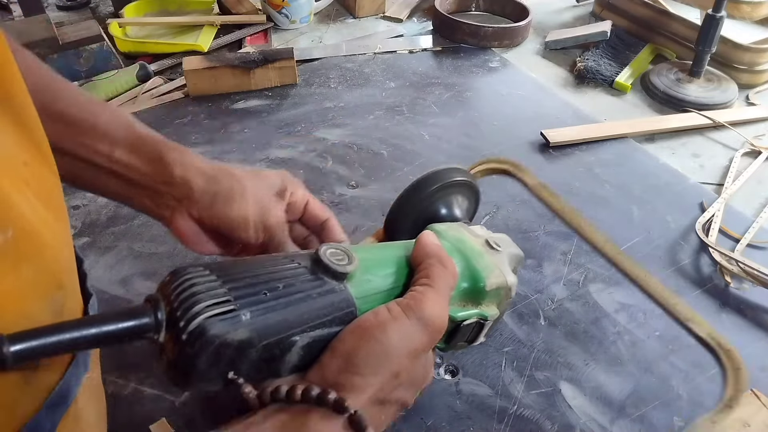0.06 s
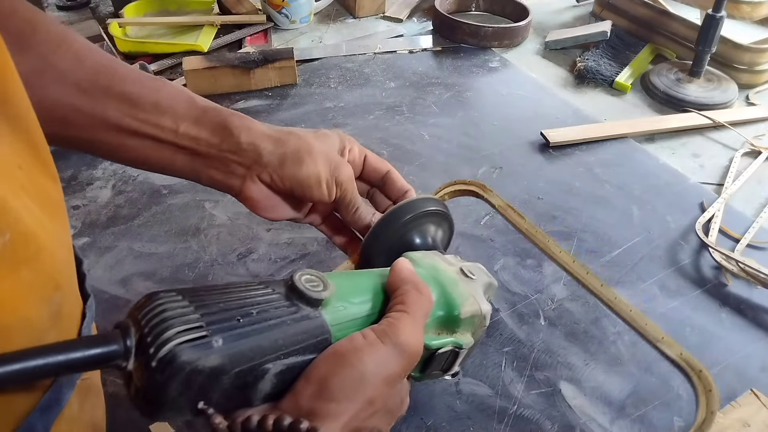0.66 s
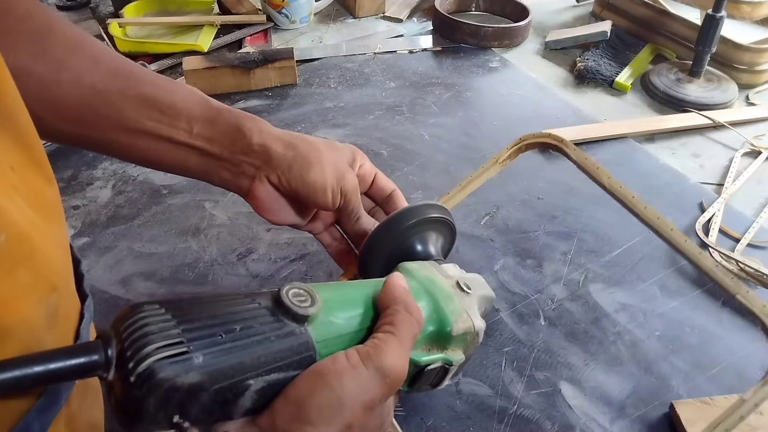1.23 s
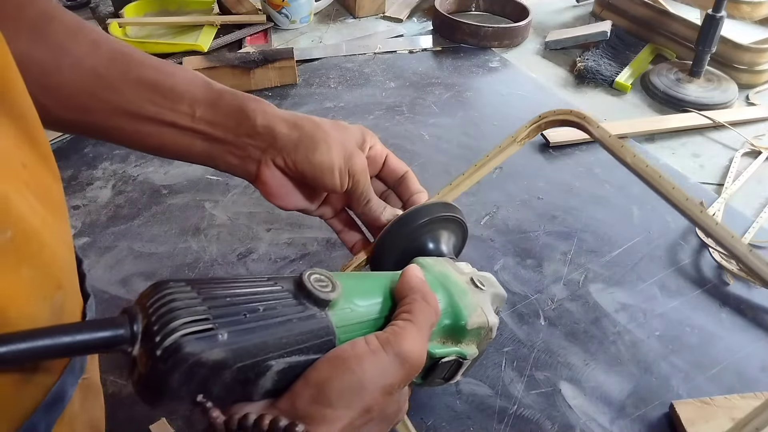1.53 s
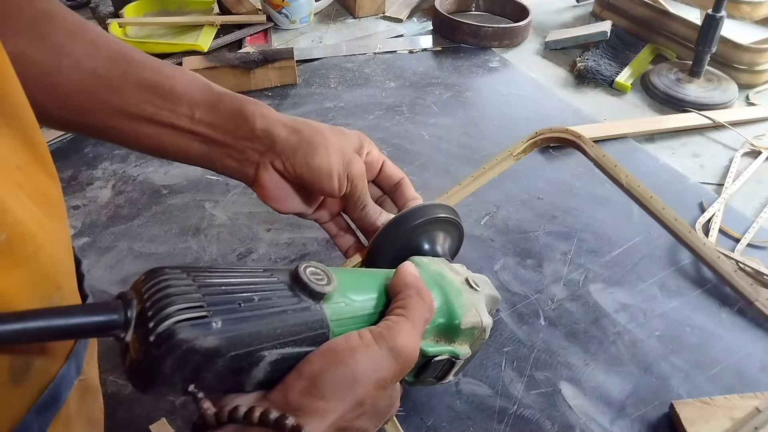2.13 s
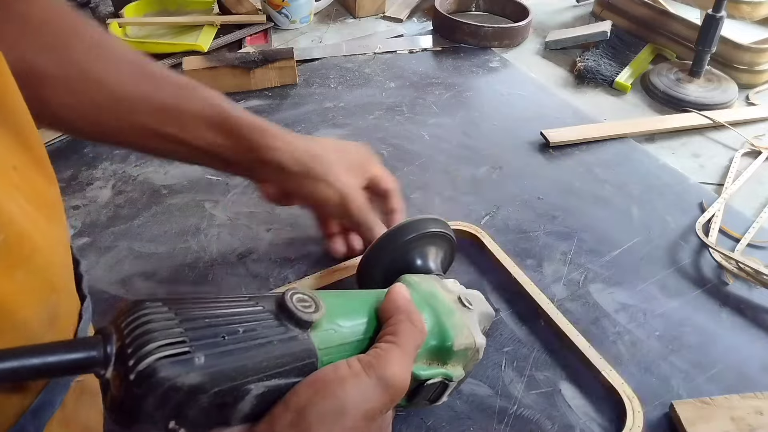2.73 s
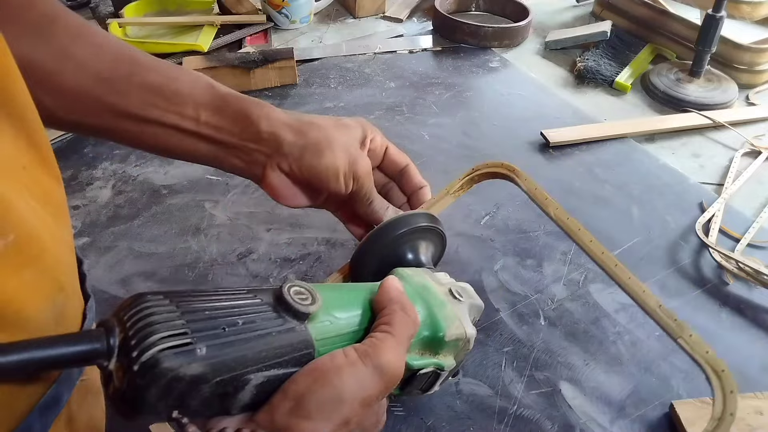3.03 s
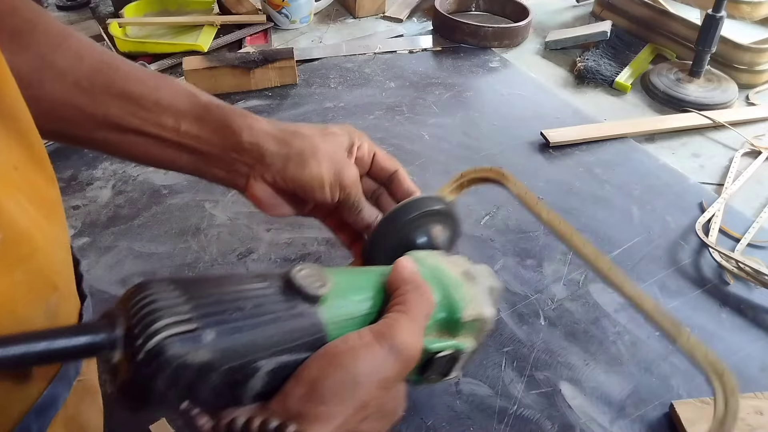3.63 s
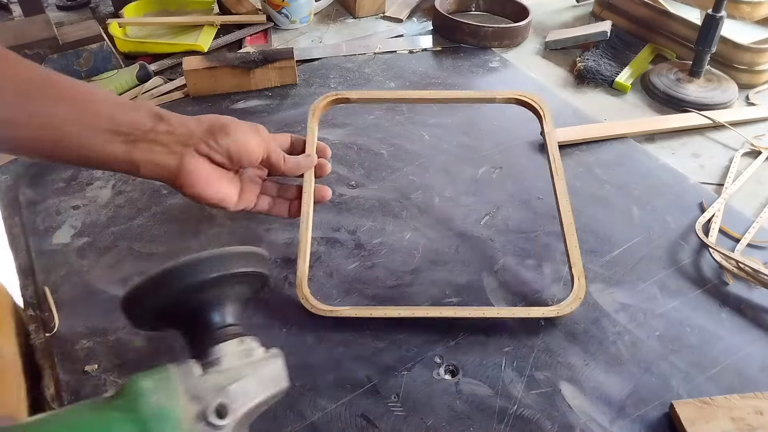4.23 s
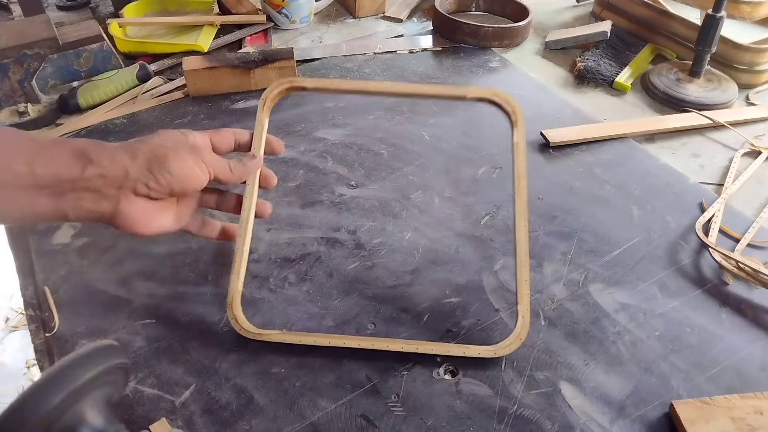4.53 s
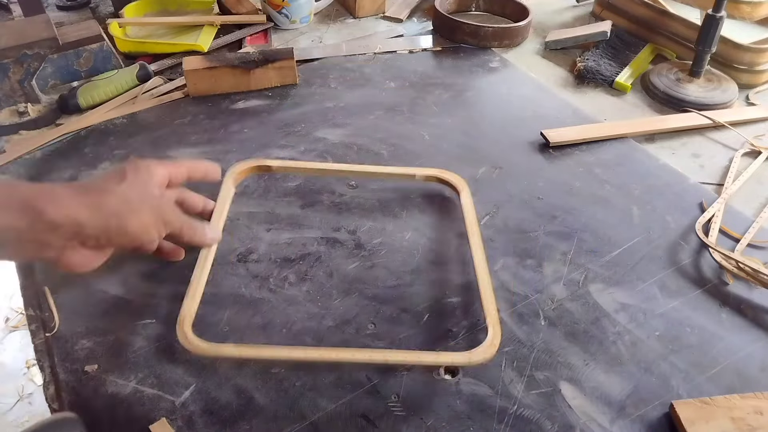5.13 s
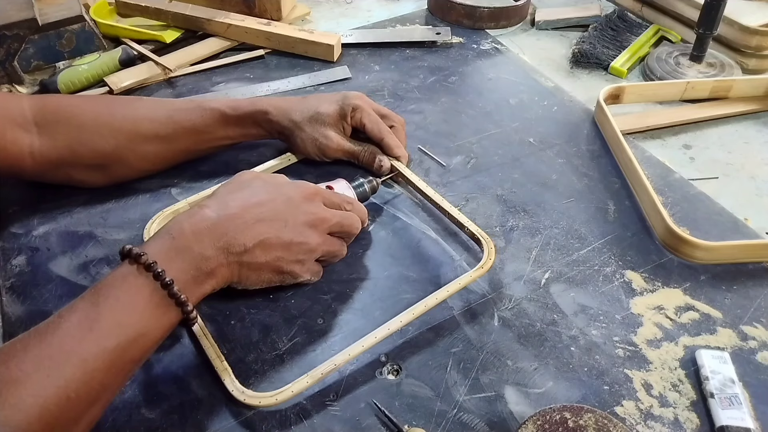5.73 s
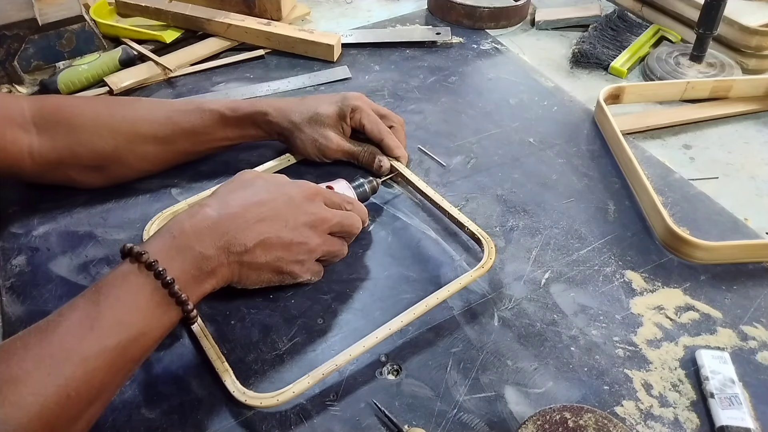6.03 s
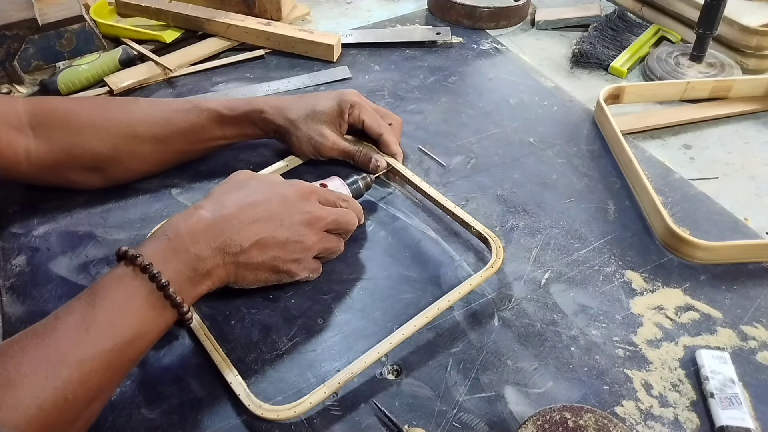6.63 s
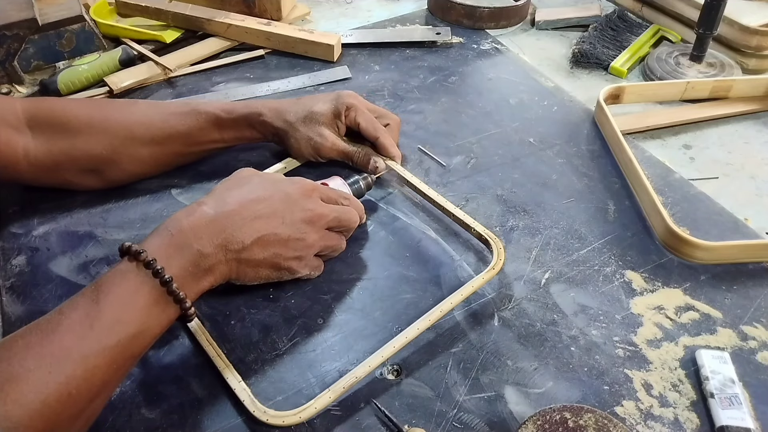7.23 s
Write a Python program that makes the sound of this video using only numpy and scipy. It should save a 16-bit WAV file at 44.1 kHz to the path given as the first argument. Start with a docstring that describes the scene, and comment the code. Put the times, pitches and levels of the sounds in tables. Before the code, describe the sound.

A loud electric grinder runs its sanding disc on wood, gritty and hissing, with a few sharper scrapes. After about four seconds it is switched off and coasts down under a handful of light wooden knocks on a workbench. Then a quieter rotary tool cuts in, whining, giving two brief squeals and dipping in speed twice. Everything is heard up close in a small workshop with little echo.

```python
"""Small workshop, close up. An angle grinder sands a thin wooden frame: gear teeth knock, grit rasps,
air hisses and the wobbling disc makes it throb. It is lifted off and coasts down with rattling gears.
The frame clatters onto the bench. Then, abruptly, a small rotary tool whines at multiples of its shaft
rate, sagging and recovering in speed, and its bit sticks and slips in the wood in two squeals."""
import sys
import numpy as np
from scipy import signal
from scipy.fft import rfft, irfft
from scipy.io import wavfile
from scipy.ndimage import uniform_filter1d

SR = 44100
rng = np.random.default_rng(int(sys.argv[2]) if len(sys.argv) > 2 else 0)


def bounce(signal):
    """Save signal as a 16-bit WAV file at the path given by the first command-line argument."""
    frames = np.transpose(np.atleast_2d(signal))
    limited = np.clip(frames, -1, 1)
    pcm = np.round(limited * 32767).astype(np.int16)
    wavfile.write(sys.argv[1], SR, pcm)


N = 320607
T = np.arange(N) / SR


def undb(db):
    return 10 ** (np.asarray(db) / 20)


def unit(x):
    """Scale to rms 1."""
    return x / np.sqrt(np.mean(x ** 2))


def turn(hz):
    """Running phase in radians."""
    return 2 * np.pi * np.cumsum(hz) / SR


def hump(centre_s, length_s):
    """Gaussian rise and fall."""
    return np.exp(-(2 * (T - centre_s) / length_s) ** 2)


def envelope(start_s, attack_s, hold_s, release_s):
    """Linear rise, hold, exponential release."""
    rise = np.clip((T - start_s) / attack_s, 0, 1)
    return rise * np.exp(-np.maximum(T - start_s - attack_s - hold_s, 0) / release_s)


def wander(hz):
    """Smooth noise of rms 1, up to about hz."""
    f = np.arange(N // 2 + 1) * SR / N
    return unit(irfft(rfft(rng.standard_normal(N)) / np.sqrt(1 + (f / hz) ** 6), N))


def narrow(phase, width_hz):
    """Noise band around a carrier phase."""
    return unit(wander(width_hz / 2) * np.cos(phase) + wander(width_hz / 2) * np.sin(phase))


def impacts(per_s, scatter_db):
    """Random tiny blows of uneven size, at even mean power."""
    hit = rng.random(N) < per_s / SR
    sign = rng.choice([-1, 1], N)
    return unit(hit * sign * undb(scatter_db * rng.standard_normal(N)) / np.sqrt(per_s))


def lift_db(hz, resonances):
    """Summed gain of resonances at hz."""
    return sum(db / (1 + (2 * (hz - centre) / width) ** 2) for centre, width, db in resonances)


def colour(x, spectrum, resonances=(), size=8192):
    """Minimum-phase filter: broad spectrum plus resonances; keeps the power of white noise."""
    f = np.arange(size // 2 + 1) * SR / size + 1
    hz, db = np.transpose(spectrum)
    gain_db = np.interp(np.log(f), np.log(hz), db) + lift_db(f, resonances)
    cepstrum = irfft(np.log(undb(gain_db)))
    cepstrum[1:size // 2] *= 2
    cepstrum[size // 2 + 1:] = 0
    response = irfft(np.exp(rfft(cepstrum)))
    return signal.fftconvolve(x, response / np.linalg.norm(response))[:N]


# room tone: f/Hz, level/dB
ROOM_SPECTRUM = [(20, -28), (60, -6), (110, -9), (250, -8), (500, -4), (2000, -12), (6000, -28),
                 (15000, -36)]


def still_air(level_db=-59.5):
    """Faint, dull noise of the workshop."""
    return colour(rng.standard_normal(N), ROOM_SPECTRUM) * undb(level_db)


def workshop(x, t60_s=0.55, wet_db=-14):
    """The cluttered walls add a short, dull tail."""
    t = T[:SR // 2]
    dull_noise = uniform_filter1d(rng.standard_normal(len(t)), size=4)
    tail = dull_noise * np.exp(-np.log(1000) * t / t60_s) * (t > .005)
    return x + undb(wet_db) * signal.fftconvolve(x, tail / np.linalg.norm(tail))[:N]


# frame knocks on the bench: t/s, level/dB
FRAME_KNOCKS = [(4.612, -25), (4.710, -33), (4.878, -30), (5.012, -27), (5.053, -29), (5.111, -23.5),
                (5.125, -22.5), (5.147, -17), (5.151, -28), (5.158, -30), (5.194, -35), (5.223, -35),
                (5.274, -31)]
# wood clack: f/Hz, level/dB
KNOCK_SPECTRUM = [(60, -27), (160, -5), (400, -5.5), (900, 0), (1300, 3), (2500, 3.5), (3800, 4.5),
                  (5500, -12.5), (8000, -8.5), (11000, -28), (15000, -27)]
# frame rings as fingers shift it: t/s, f/Hz, level/dB
FRAME_TAPS = [(4.704, 2380, -22), (4.878, 2230, -21), (4.925, 2200, -38), (4.941, 2260, -24),
              (4.962, 2200, -42)]
# bench-top thuds: t/s, f/Hz, level/dB
BENCH_BUMPS = [(.07, 135, -43), (.48, 95.3, -43), (2.91, 132.5, -43), (2.965, 150, -35), (2.975, 270, -34),
               (3.085, 145, -45), (3.17, 145.3, -45), (3.39, 140, -43), (5.108, 171, -38),
               (5.146, 192, -51), (5.316, 124, -37.5), (5.59, 112, -56)]


def frame_on_bench(knock_decay_s=0.0057, tap_decay_s=0.0055, bump_decay_s=0.017):
    """Light wood clacks and rings; the bench answers heavier touches with a low thud."""
    clacks, rings, thuds = np.zeros((3, N))
    for at_s, db in FRAME_KNOCKS:
        clacks += (T >= at_s) * undb(db) * np.exp(-np.abs(T - at_s) / knock_decay_s)
    for at_s, hz, db in FRAME_TAPS:
        age_s = np.maximum(T - at_s, 0)
        rings += undb(db) * np.exp(-age_s / tap_decay_s) * np.sin(2 * np.pi * hz * age_s)
    for at_s, hz, db in BENCH_BUMPS:
        age = np.maximum(T - at_s, 0) / bump_decay_s
        thuds += undb(db) * 2 * np.sqrt(age) * np.exp(-age) * narrow(2 * np.pi * hz * T, width_hz=103)
    return colour(clacks * rng.standard_normal(N), KNOCK_SPECTRUM) + rings + thuds


# two squeals of four chirps: t/s, length/s, start f/Hz, end f/Hz, width/Hz, level/dB
BIT_CHIRPS = [(5.583, 0.019, 5000, 4750, 700, -30), (5.599, 0.02, 3680, 3670, 70, -17.5),
              (5.615, 0.012, 2780, 2840, 148, -20), (5.624, 0.027, 3950, 4050, 420, -19),
              (5.694, .028, 4400, 4150, 706, -28), (5.714, 0.024, 3560, 3480, 81, -20),
              (5.74, 0.0243, 3600, 3870, 435, -19), (5.749, 0.023, 3800, 4050, 342, -20)]


def bit_squeals():
    """The bit sticks and slips in short rough chirps."""
    out = np.zeros(N)
    for start_s, length_s, start_hz, end_hz, width_hz, db in BIT_CHIRPS:
        progress = np.clip((T - start_s) / length_s, 0, 1)
        # faster phase diffusion gives a wider, rougher tone
        slip = np.cumsum(rng.standard_normal(N)) * np.sqrt(np.pi * width_hz / SR)
        phase = turn(start_hz + (end_hz - start_hz) * progress) + uniform_filter1d(slip, size=30)
        out += np.sqrt(2 * np.abs(np.sin(np.pi * progress))) * undb(db) * np.sin(phase)
    return out


def partial(shaft_phase, order, db, flutter_db):
    """One multiple of the shaft rate, fluttering in level."""
    flutter = unit(undb(flutter_db * wander(21)))
    return np.sqrt(2) * undb(db) * flutter * np.sin(order * shaft_phase + rng.uniform(0, 2 * np.pi))


# bit brushes the wood: t/s, length/s, gain/dB
BIT_BRUSHES = [(5.328, 0.034, -34.5), (5.56, 0.23, -33.5), (5.88, 0.22, -38), (6.705, 0.15, -39),
               (6.876, 0.16, -36)]
# bit on wood: f/Hz, level/dB
CHATTER_SPECTRUM = [(1000, -22), (3000, -1), (3700, 19.5), (4800, 8.5), (5600, 1), (6500, 2), (8300, -22),
                    (9500, -4), (10500, -4), (12000, -9), (15500, -26)]


def bit_chatter(shaft_phase, attack_s=0.058, release_s=0.054):
    """While in contact, the bit ticks against the wood once a turn."""
    ticks = sum(partial(shaft_phase, order, db=0, flutter_db=3.8) for order in range(9, 41))
    contact = sum(undb(db) * envelope(start_s, attack_s, length_s - attack_s, release_s)
                  for start_s, length_s, db in BIT_BRUSHES)
    return colour(unit(ticks), CHATTER_SPECTRUM) * contact


# whine (18 = commutator whistle): shaft order, full-speed level/dB, flutter/dB, full-load gain/dB
SHAFT_PARTIALS = [(1, -35, -0.4, 2.5), (2, -43.5, 1.5, 8.5), (3, -37.5, 2.0, 0), (4, -48, 8, -4),
                  (5, -36.5, 1.2, -5), (6, -46.5, -2, -5), (7, -49.5, 1.5, 2), (9, -41, -1, -1),
                  (10, -43.5, -4, -2), (12, -49, 6, 3), (13, -52.5, -1, 8), (18, -41, 2.5, -3),
                  (21, -54, 7, -3), (24, -60, 4, -3)]
# partials that ring out briefly: shaft order, t/s, length/s, gain/dB
PARTIAL_RINGS = [(3, 5.42, 0.16, 3.5), (5, 5.69, 0.047, 10.5), (5, 5.79, 0.11, 5), (5, 5.95, 0.18, 8),
                 (5, 7.5, 0.1, 10), (7, 5.92, 0.06, 4)]
# resonances and dead spots of tool and bench: f/Hz, width/Hz, gain/dB
CASING_MODES = [(307, 14, 5), (336, 23, -12), (372, 15, 4.5), (624, 16, -11), (696, 60, 6.5),
                (776, 8.4, -11), (783, 8, 0.5), (1138, 36, 8.5), (1173, 6.1, -5), (1780, 110, 5),
                (1915, 25, 13), (1955, 28, 6.5), (2717, 180, 14.5), (4460, 79, 10), (6870, 310, 8),
                (8070, 200, 10), (9400, 150, 11)]


def shaft_whine(shaft_hz, shaft_phase, full_load_hz_per_s=300, slowing_db=8.5):
    """Partials glide through fixed resonances and weaken as the shaft slows, the high ones most."""
    slowing_hz_per_s = uniform_filter1d(-np.gradient(shaft_hz) * SR, size=SR // 20)
    load = np.clip(slowing_hz_per_s / full_load_hz_per_s, 0, 1)
    halvings = np.log2(shaft_hz.max() / shaft_hz)
    out = np.zeros(N)
    for order, db, flutter_db, load_db in SHAFT_PARTIALS:
        drive_db = db + load_db * load - slowing_db * np.log2(order) * halvings
        ring_db = sum(gain_db * hump(at_s, length_s)
                      for k, at_s, length_s, gain_db in PARTIAL_RINGS if k == order)
        casing_db = lift_db(order * shaft_hz, CASING_MODES)
        out += partial(shaft_phase, order, drive_db + ring_db + casing_db, flutter_db)
    return out


# shaft rate: t/s, f/Hz
SHAFT_RATE = [(5.36, 375.7), (5.498, 386.2), (5.636, 392.4), (5.96, 390.6), (6.088, 381.9), (6.152, 370.2),
              (6.296, 311.7), (6.338, 308.5), (6.36, 321.7), (6.486, 351.6), (6.55, 363.1), (6.7, 380.1),
              (6.8, 384.8), (6.956, 379.1), (7.034, 369.8), (7.216, 330.2), (7.27, 332.4)]
# cooling air: f/Hz, level/dB
FAN_SPECTRUM = [(30, -27), (90, -14.5), (150, -4.5), (250, -15.5), (550, -11), (800, -2.5), (1250, 3.5),
                (1900, 2.5), (2400, -6), (3800, 0), (5200, -9.5), (6500, -11), (7900, -3.5), (10000, -20),
                (15500, -15.5)]


def rotary_tool(bearing_db=-33.5, bearing_pulse=0.59, fan_db=-30.5):
    """One shaft drives whine, bearing whirr, fan and bit; the mains pulses the whirr and the air."""
    shaft_hz = np.interp(T, *np.transpose(SHAFT_RATE))
    speed = shaft_hz / shaft_hz.max()
    shaft_phase = turn(shaft_hz * (1 + 0.001 * wander(33)))
    whine = shaft_whine(shaft_hz, shaft_phase)
    torque = np.cos(2 * np.pi * 100 * T)  # two pulses per mains cycle
    whirr = narrow(8 * shaft_phase + .8 * torque, width_hz=100)
    bearing = unit(whirr * (1 + bearing_pulse * torque)) * undb(bearing_db)
    airflow = undb(fan_db) * speed ** 1.5 * (1 + 0.2 * torque)
    air = colour(rng.standard_normal(N), FAN_SPECTRUM, resonances=[(161, 120, 5.6)]) * airflow
    return whine + bearing + air + bit_chatter(shaft_phase)


# disc edge bites harder: t/s, length/s, level/dB
RIM_BITES = [(0.37, 0.013, -22), (0.442, 0.046, -25), (0.526, 0.067, -26), (0.59, 0.11, -31),
             (0.683, 0.1, -26.5), (2.913, .04, -25), (2.963, 0.056, -23), (3.034, 0.044, -26),
             (3.17, .03, -29), (3.40, 0.061, -29)]
# rim on wood: f/Hz, level/dB
SCRATCH_SPECTRUM = [(300, -19), (2000, -24), (4000, -24), (6000, 2), (9000, 7), (11000, 0), (13000, 6),
                    (15500, -6)]


def rim_scratches(disc_hz=185):
    """During each bite, the grinder's rim catches the wood once a turn."""
    bite = sum(undb(db) * hump(at_s, length_s) for at_s, length_s, db in RIM_BITES)
    catches = unit(undb(6 * np.cos(2 * np.pi * disc_hz * T)))
    return colour(impacts(per_s=12000, scatter_db=3.5) * catches, SCRATCH_SPECTRUM) * bite


# passing grinder tones: t/s, attack/s, hold/s, release/s, f/Hz, glide/(Hz/s), width/Hz, waver/dB, level/dB
HOARSE_TONES = [(0.268, 0.03, 0.04, 0.03, 1400, 0, 200, 2, -22),
                (2.85, 0.05, 0.1, 0.046, 4100, 4, 50, 10, -23),
                (3.262, 0.06, 0.25, 0.06, 2945, -150, 490, 2.5, -19.5),
                (3.65, 0.07, 0.02, 0.04, 2780, -62, 400, 3, -16.5),
                (3.71, 0.11, 0.073, 0.07, 1680, -600, 563, 1.5, -16),
                (3.918, 0.052, 0.06, 0.13, 1420, 701, 560, 1.3, -14.5),
                (4.086, 0.028, 0.068, 0.31, 2787, -59, 260, 0.5, -26.5),
                (4.72, 0.06, 0.09, 0.04, 9200, -5500, 90, 6, -58)]


def grinder_swells(low_cut_hz=400):
    """Hoarse tones come and go: wood rings, vents whistle, the free disc rushes, slowing gears sing."""
    out = np.zeros(N)
    for start_s, attack_s, hold_s, release_s, hz, hz_per_s, width_hz, waver_db, db in HOARSE_TONES:
        glide_hz = np.clip(hz + hz_per_s * np.maximum(T - start_s, 0), hz / 2, 2 * hz)
        tone = unit(narrow(turn(glide_hz), width_hz) * undb(waver_db * wander(16)))
        out += undb(db) * tone * envelope(start_s, attack_s, hold_s, release_s)
    return signal.sosfilt(signal.butter(2, low_cut_hz, "high", fs=SR, output="sos"), out)


# gear rattle, grit rasp, air hiss: f/Hz, level/dB
GEAR_SPECTRUM = [(30, -69), (90, -27.5), (280, -20.5), (580, -9.5), (720, -2.5), (1100, 0), (1900, -5.5),
                 (3200, -8.5), (4500, -21.5), (8000, -23), (16000, -37)]
RASP_SPECTRUM = [(300, -44.5), (1000, -10), (2000, -4.5), (2900, -4.5), (3650, -1), (4150, -3),
                 (4900, -9.5), (5700, -17.5), (7000, -15), (10000, -28), (16000, -51.5)]
HISS_SPECTRUM = [(2500, -33.5), (5500, -14), (6900, -5.5), (7900, 2.5), (8700, 0.5), (9600, -6.5),
                 (10700, -12), (12000, -11.5), (13000, -8.5), (13600, -9), (15600, -4.5)]
# resonances of gear housing, disc on wood, grinder held clear: f/Hz, width/Hz, gain/dB
HOUSING_MODES = [(170, 86, 10), (351, 17, 8), (432, 91, 5), (541, 115, 5), (697, 62, 6.5), (766, 40, -4),
                 (860, 94, 6), (1048, 55, -6.5), (1120, 98, 3), (1250, 40, -0.5), (1383, 180, 6.5),
                 (1490, 54, 6), (1840, 170, 8), (1924, 40, -15)]
DISC_MODES = [(2320, 210, 3), (2445, 87, -5), (2720, 180, -2.5), (2802, 55, 8), (3280, 56, 4.5),
              (3830, 23, 9), (4310, 47, 4.5), (4130, 91, 2), (4660, 210, 2.5)]
LIFTED_MODES = [(258, 35, -0.5), (482, 46, 4), (720, 180, 9), (1050, 110, -4), (1310, 120, 3.5),
                (1550, 90, 1), (2230, 330, 1.5), (3250, 340, 2), (4070, 160, -0.5), (5900, 2400, -6),
                (8040, 1400, 5), (13300, 5000, -2)]
# wood modes flaring under the disc: f/Hz, width/Hz, level/dB re rasp
WOOD_MODES = [(2350, 260, -11.5), (3198, 200, -15), (3640, 190, -9.5), (4090, 250, -16.5)]
# hand eases or presses: t/s, length/s, gain/dB
HAND_PRESSURE = [(0.02, 0.29, -2.5), (1.07, 0.2, 0.1), (1.84, 0.047, -4), (2.18, 0.13, -0.7),
                 (2.62, 0.26, -3), (3.09, 0.16, 1.5), (3.55, 0.57, -1.5)]


def grinder(lift_s=3.66, lift_length_s=0.53, off_s=4.085, coast_s=0.8, throb_hz=43.1, teeth_per_s=3400):
    """Gears knock, grit rasps, air hisses, the wobbling disc throbs; lifted, it then coasts down."""
    speed = np.exp(-np.maximum(T - off_s, 0) / coast_s)
    halvings = np.log2(1 / speed)
    lifted = np.clip((T - lift_s) / lift_length_s, 0, 1)
    unsteady_db = 1.5 * wander(2.6)
    press_db = unsteady_db + sum(db * hump(at_s, length_s) for at_s, length_s, db in HAND_PRESSURE)
    # loose gears keep rattling at first and give way later
    gear_db = -21.5 + press_db - 1.5 * lifted - 6 * halvings ** 1.49
    rasp_db = -15.5 + 0.084 * press_db - 5 * lifted - 12 * halvings
    hiss_db = -21 + 0.52 * press_db - 6 * lifted - 13 * halvings

    def body(x, spectrum, modes_on_wood=()):
        """The resonances change as the machine leaves the wood."""
        on_wood = colour(x, spectrum, modes_on_wood)
        held_clear = colour(x, spectrum, LIFTED_MODES)
        return on_wood * (1 - lifted ** 2) + held_clear * lifted ** 2

    teeth = impacts(teeth_per_s * speed, scatter_db=2.0)
    wobble = np.cos(turn(throb_hz * np.sqrt(speed) * (1 + .003 * wander(3))))
    # the disc grabs and lets go, shaking rasp and hiss together
    grab = unit(undb(1.8 * wobble + 0.43 * wander(130) + 0.16 * wander(760)))
    grains = np.sqrt(speed) * impacts(per_s=9000, scatter_db=3.5)
    grit = unit(0.6 * teeth + 0.64 * grains + 0.28 * rng.standard_normal(N))
    rattle = unit(teeth + 0.57 * rng.standard_normal(N))
    gears = body(rattle, GEAR_SPECTRUM, HOUSING_MODES) * undb(gear_db + 0.74 * wobble)
    wood = sum(undb(db) * unit(narrow(2 * np.pi * hz * T, width_hz) * undb(3.7 * wander(13)))
               for hz, width_hz, db in WOOD_MODES)
    rasp = (body(grit * grab, RASP_SPECTRUM, DISC_MODES) + wood * grab * (1 - lifted)) * undb(rasp_db)
    air = unit(grit + .5 * rng.standard_normal(N))
    hiss = body(air * grab, HISS_SPECTRUM) * undb(hiss_db)
    return gears + rasp + hiss + rim_scratches() + grinder_swells()


def scene(handover_s=5.357, crossfade_s=0.018):
    """The rotary tool abruptly takes over from the grinder; mono."""
    handover = np.clip((T - handover_s) / crossfade_s + .5, 0, 1)
    tools = grinder() * (1 - handover) + rotary_tool() * handover
    direct = tools + bit_squeals() + frame_on_bench()
    return (workshop(direct) + still_air())[None]


def record(dry, low_cut_hz=48, ceiling=1.3, high_cut_hz=15700):
    """Low cut, soft clip, steep high cut."""
    thinned = signal.sosfilt(signal.butter(2, low_cut_hz, "high", fs=SR, output="sos"), dry)
    rounded = ceiling * np.tanh(thinned / ceiling)
    return signal.sosfilt(signal.ellip(12, .1, 80, high_cut_hz, fs=SR, output="sos"), rounded)


dry = scene()
out = record(dry)
bounce(out)
```